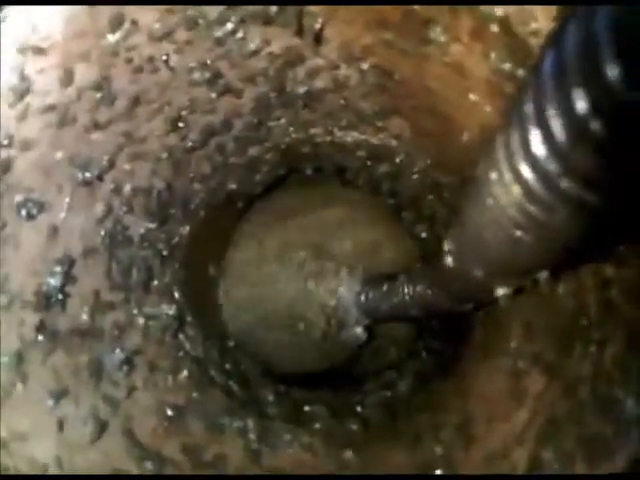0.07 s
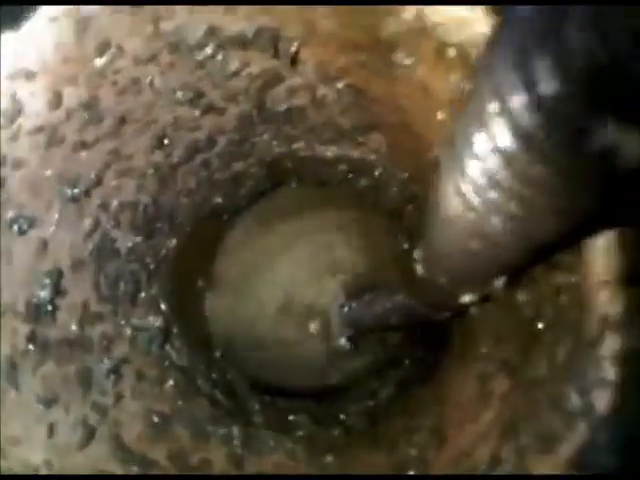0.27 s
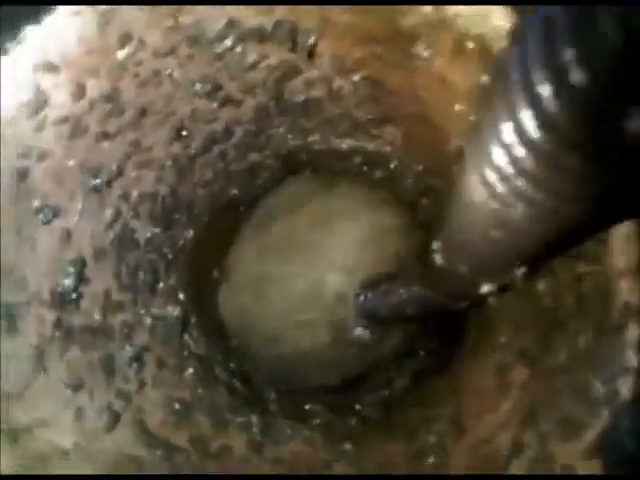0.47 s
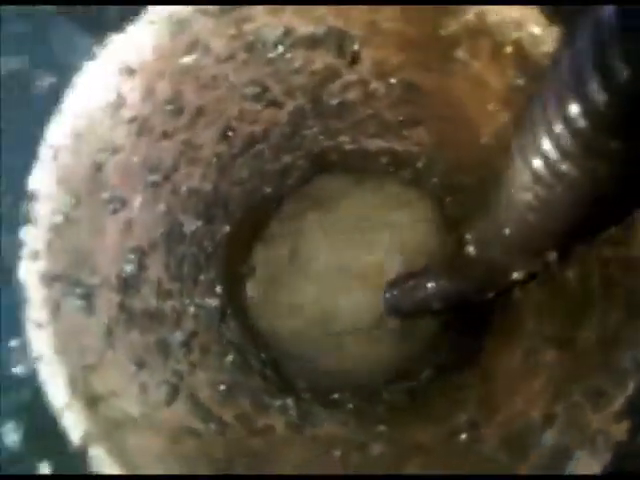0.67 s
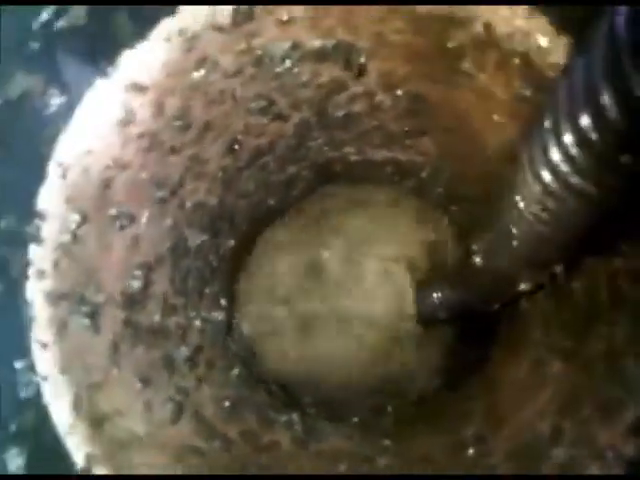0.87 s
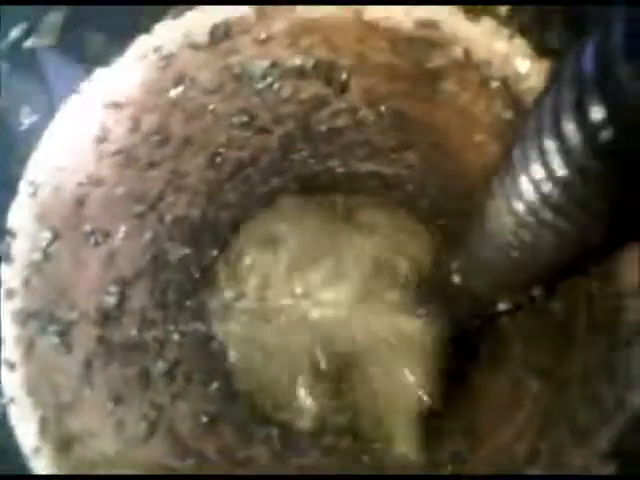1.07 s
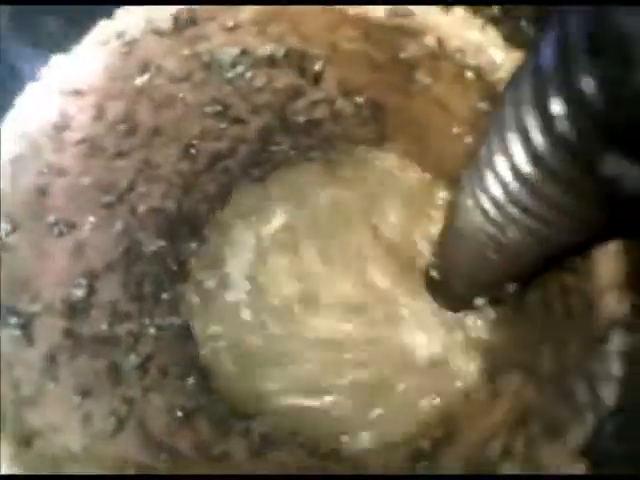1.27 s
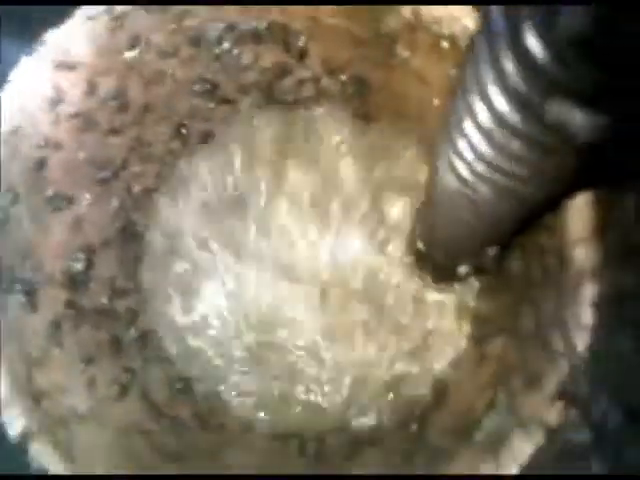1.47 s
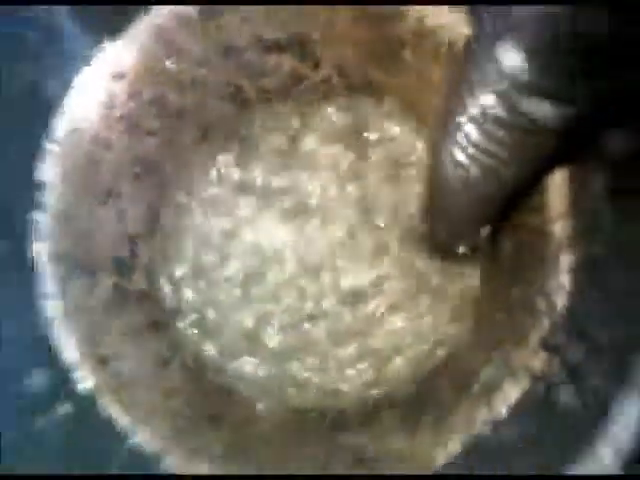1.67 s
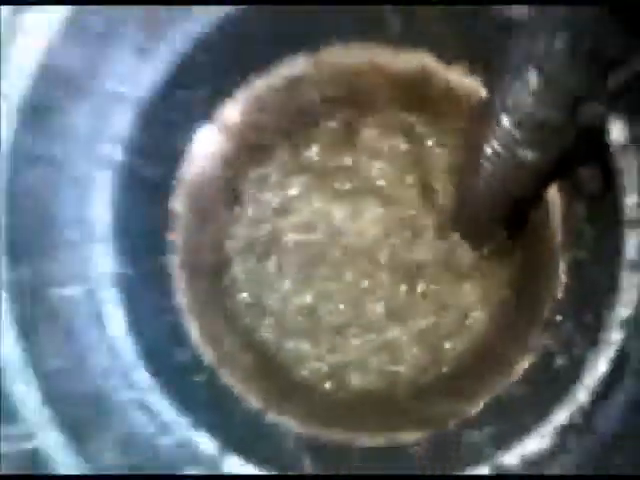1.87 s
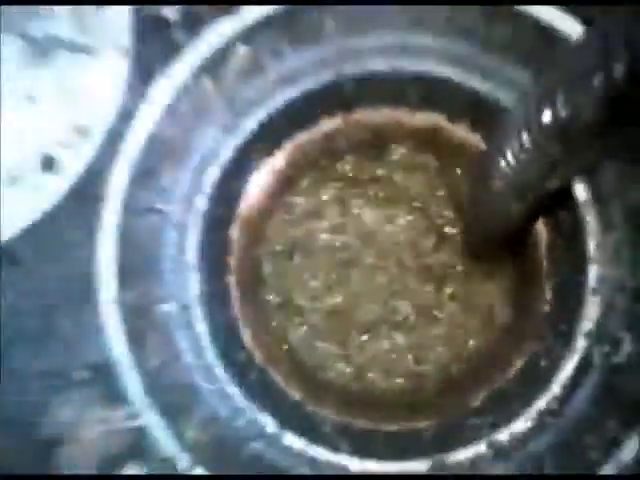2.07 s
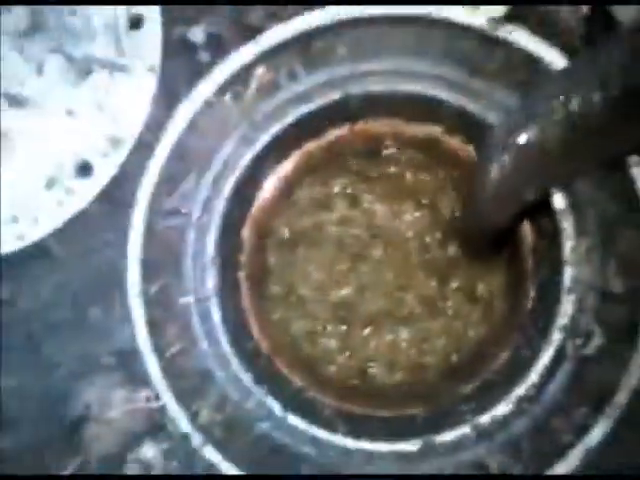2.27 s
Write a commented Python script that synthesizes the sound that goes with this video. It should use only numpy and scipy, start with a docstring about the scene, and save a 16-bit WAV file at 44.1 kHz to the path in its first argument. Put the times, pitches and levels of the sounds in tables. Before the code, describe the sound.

Close up on a narrow-sounding microphone in a quiet bathroom: a drain snake scrapes and thumps the basin, small plops follow, then duller metallic scrapes mix with gurgling air, churning water and bright drips.

```python
"""A faint trickle in quiet bathroom air, then the rasp of a coiled steel cable in a clogged basin drain,
close to a small microphone. The coils catch on the drain wall: stuttering bursts of grit ring the pipe,
and finer grit rubs beneath them. Knocks thump the basin as decaying low modes with a short clank.
Air gulps and churns in the rising water as swelling cycles and wavering tones that climb in pitch.
Plops, pings, drips and the trickle are bubbles: a few cycles that swell, fade and creep upward."""
import sys
import numpy as np
from scipy import signal
from scipy.fft import rfft, irfft
from scipy.io import wavfile
from scipy.ndimage import uniform_filter1d

SR = 44100
rng = np.random.default_rng(int(sys.argv[2]) if len(sys.argv) > 2 else 0)


def wrap_up_sound(samples):
    """Save the sound to the file named by the first command line argument, as 16-bit audio."""
    columns = np.atleast_2d(samples).T
    # keep every value between -1 and 1, then stretch to whole-number steps
    tamed = np.clip(columns, -1, 1)
    steps = np.round(tamed * 32767).astype(np.int16)
    wavfile.write(sys.argv[1], SR, steps)


N = 101430  # samples

ATTACK_SHARE, RELEASE_S, GRIT_DB = 0.16, 0.0028, 1  # attack as a share of the catch's length
RING_WIDTH_HZ, RING_DB = 130, -3  # the strongest ring, relative to the rest of the pipe
BROAD_DB = -17  # broad resonance behind the separate ones
BODY_HZ, BODY_WIDTH_HZ = 447, 486
STUTTER_DB, MODE_STUTTER_DB = 3.5, 5
# the risen water dulls and damps the steel
WET_FROM_S = 1.4
DRY_TREBLE_HZ, WET_TREBLE_HZ, TREBLE_WIDTH_HZ = 6070, 5110, 3020
DRY_WIDTH_HZ, WET_WIDTH_HZ = 75, 140  # width of each pipe resonance
PATCH_WIDTH_HZ, PATCH_SPREAD = 1300, 0.22  # patches of treble, spread in log frequency
# catches of the coils on the drain wall, close to the microphone: (time [s], pipe level [dB],
# low body level [dB], treble level [dB], strongest ring [Hz], length [ms])
CATCH_TABLE = [(0.026, -63, -59, -78, 1420, 5.8), (0.125, -66.5, -66, -62.5, 1570, 3.6),
               (0.217, -39.5, -36, -51, 1030, 6), (0.244, -40, -56, -57, 2320, 12.6),
               (0.287, -35, -44, -47.5, 945, 8.3), (0.297, -35.5, -42.5, -45.5, 2140, 9.3),
               (0.33, -47.5, -61, -66.5, 675, 2.4), (0.524, -46, -49.5, -55.5, 697, 3.6),
               (0.534, -43, -45, -49, 1327, 6.9), (0.549, -48, -52.5, -58.5, 1880, 22.2),
               (0.57, -44.5, -48.5, -49, 1946, 21.9), (0.599, -51, -53.5, -62, 1950, 9.4),
               (0.639, -53, -53, -49, 2050, 6.3), (0.669, -63.5, -58.5, -59.5, 1440, 17),
               (0.697, -42.5, -46, -74, 1923, 6.7), (0.707, -48, -58, -63, 1660, 10.6),
               (0.719, -48.5, -53.5, -50, 716, 10.6), (0.768, -51, -52, -57, 1993, 17),
               (0.835, -54, -67, -66.5, 690, 6.9), (1.385, -47.5, -61, -51.5, 1290, 4),
               (1.447, -55.5, -57, -73, 1470, 12.6), (1.459, -51.5, -55.5, -52, 728, 3.9),
               (1.573, -62, -68, -58.5, 2500, 7.7), (1.584, -51.5, -53, -76, 1500, 9.1),
               (1.602, -56, -67, -74, 2580, 34), (1.632, -46.5, -60, -65, 1780, 6.8),
               (1.652, -66, -46, -49, 2000, 2), (1.667, -48.5, -45.5, -65, 1716, 17),
               (1.696, -42.5, -58, -48, 2630, 3.4), (1.741, -50, -60, -54, 2654, 12.9),
               (1.803, -42.5, -65, -56, 1337, 8.1), (1.835, -51, -56, -64, 2840, 4.7),
               (1.844, -51.5, -57, -58.5, 2180, 10), (1.897, -38.5, -55, -50.5, 2113, 1.15),
               (1.902, -43.5, -73, -99, 1330, 5.4), (2.095, -45.5, -68, -57.5, 2710, 11.4),
               (2.112, -47, -74, -79, 1260, 7.9), (2.128, -46.5, -60, -69, 1297, 10),
               (2.148, -54.5, -63, -77, 1910, 15), (2.164, -49.5, -63, -86, 1380, 11),
               (2.189, -58, -69, -81, 1360, 19), (2.279, -59.5, -76, -69, 2160, 3)]


def catches():
    """Each catch is a stuttering burst of grit that rings the pipe, its body and patches of the steel's treble."""
    out, t = np.zeros(N), np.arange(3072) / SR
    for start, pipe_db, body_db, treble_db, ring_hz, ms in CATCH_TABLE:
        length = ms / 1000
        rise = np.minimum(t / (ATTACK_SHARE * length), 1)
        env = rise * np.exp(-np.maximum(t - length, 0) / RELEASE_S)
        energy_span = SR * (length + RELEASE_S / 2)

        def unit(x):
            """Unit power over the length of the catch."""
            return x / np.sqrt(np.sum(x ** 2) / energy_span)

        low_grit, treble_grit = grit((2, len(t)), GRIT_DB) * env * slips(len(t), STUTTER_DB)
        wet = start >= WET_FROM_S
        steel_hz = WET_TREBLE_HZ if wet else DRY_TREBLE_HZ
        width_hz = WET_WIDTH_HZ if wet else DRY_WIDTH_HZ

        strongest = band_twice(low_grit, ring_hz, RING_WIDTH_HZ)
        ring = unit(pipe(low_grit, width_hz)) + undb(RING_DB) * unit(strongest)

        broad_body = undb(BROAD_DB) * band_twice(low_grit, BODY_HZ, BODY_WIDTH_HZ)
        body = modes(low_grit, True, width_hz) + broad_body

        treble = band_twice(treble_grit, steel_hz, TREBLE_WIDTH_HZ)
        for patch_hz in steel_hz * np.exp(PATCH_SPREAD * rng.uniform(-1.58, 1, size=2)):
            stuttered = treble_grit * slips(len(t), MODE_STUTTER_DB)
            treble += band_twice(stuttered, patch_hz, PATCH_WIDTH_HZ)

        burst = undb(pipe_db) * unit(ring) + undb(body_db) * unit(body) + undb(treble_db) * unit(treble)
        add(out, start, burst)
    return out


def grit(size, spread_db):
    """Dense clicks of uneven strength."""
    return rng.standard_normal(size) * undb(spread_db * np.minimum(rng.exponential(size=size), 3))


def slips(size, db):
    """A gain that jumps every few milliseconds as the coils stick and slip."""
    hold = 110  # samples
    heights = np.r_[1, rng.standard_normal(size // hold + 1)]
    steps = uniform_filter1d(np.repeat(heights, hold), size=40)[:size]
    return undb(db * np.clip(steps, -2, 2))


BODY_TOP_HZ, PIPE_TOP_HZ = 900, 3400


def pipe(x, width_hz):
    """The separate resonances above the body plus a broad one, kept to the pipe's own range."""
    rings = modes(x, False, width_hz) + undb(BROAD_DB) * band(x, 2700, 1400)
    sos = signal.butter(4, (BODY_TOP_HZ, PIPE_TOP_HZ), "band", fs=SR, output="sos")
    return signal.sosfilt(sos, rings)


MODE_SCATTER_DB, MODE_DETUNE = 4, 0.015  # each contact point favours other resonances
# resonances of drain pipe and cable: (pitch [Hz], relative level [dB])
PIPE_MODES = [(441, -5.5), (554, -9.5), (759, -9.5), (1035, -1.5), (1355, -3.5), (1647, 2.5), (2050, -2),
              (2180, -8.5), (2335, -9), (2710, -6.5), (2925, -20), (3420, -29.5)]


def modes(x, low, width_hz):
    """The resonances below or above the body's top; each is favoured, detuned and caught by its own chance."""
    out = np.zeros(len(x))
    for hz, db in PIPE_MODES:
        if (hz < BODY_TOP_HZ) == low:
            gain = undb(db + MODE_SCATTER_DB * rng.uniform(-4.1, 1))
            caught = x * slips(len(x), MODE_STUTTER_DB)
            detuned_hz = hz * (1 + MODE_DETUNE * rng.standard_normal())
            out += gain * band(caught, detuned_hz, width_hz)
    return out


KNOCK_T60_S, KNOCK_PUSH_S = 0.13, 0.0016
DEEP_HZ, DEEP_DB, DEEP_T60_S = 105.8, -15.5, 0.27  # level relative to the upper mode
CLANK_DB, CLANK_T60_S = -10, 0.042
# knocks on the basin: (time [s], level of the upper mode [dB], its pitch [Hz])
KNOCK_TABLE = [(0.2207, -17, 168.3), (0.289, -30.5, 167), (0.531, -37.5, 169.7), (0.695, -36, 182),
               (1.632, -39.5, 169), (1.667, -40, 171)]


def knocks():
    """A soft push sets off the basin's two low modes and a short clank of the pipe."""
    out, t = np.zeros(N), np.arange(16384) / SR

    def mode(hz, t60):
        """A sine that loses 60 dB in t60 seconds."""
        return np.sin(2 * np.pi * hz * t) * undb(-60 * t / t60)

    clank = np.zeros(len(t))
    for k, (hz, db) in enumerate(PIPE_MODES):
        clank += (-1) ** k * undb(db) * mode(hz, CLANK_T60_S)  # alternating signs
    deep = undb(DEEP_DB) * mode(DEEP_HZ, DEEP_T60_S)
    push = 1 - np.exp(-t / KNOCK_PUSH_S)
    for start, db, hz in KNOCK_TABLE:
        ring = mode(hz, KNOCK_T60_S) + deep + undb(CLANK_DB) * clank
        add(out, start, undb(db) * ring * push)
    return out


CHURN_DB, CHURN_WIDTH_HZ = -3, 66  # level ahead of the resonance and the curve
# gulps of air in the drain: (time [s], peak level [dB], starting pitch [Hz])
GULP_TABLE = [(1.448, -38.5, 255.7), (1.465, -40.5, 241.6), (1.509, -44.5, 244.6), (1.542, -37.5, 257),
              (1.591, -35, 247), (1.608, -39.5, 261), (1.633, -35, 303), (1.662, -36, 297),
              (1.676, -33.5, 229), (1.708, -41, 298), (1.721, -48, 286), (1.746, -35, 298),
              (1.845, -43.5, 312), (1.862, -37, 324), (2.104, -41, 424), (2.136, -42.5, 460),
              (2.165, -41, 410)]
# churning of the air column over the rising water, one list per spell:
# (time [s], relative level [dB], pitch [Hz])
CHURN_SPELLS = [
    [(1.42, -83.5, 253.7), (1.668, -35.5, 269), (1.9, -75, 349.6)],
    [(2.06, -68.5, 364.5), (2.112, -43.5, 400.6), (2.24, -65.5, 429)],
]


def gulps():
    """Single gulps over a churning air column whose pitch climbs with the water."""
    out = np.zeros(N)
    for start, db, hz in GULP_TABLE:
        add(out, start, undb(db) * bubble(hz, rise=0.99, fall=2.14, glide=0.018))
    smoothing = np.exp(-np.pi * CHURN_WIDTH_HZ / SR)
    for rows in CHURN_SPELLS:
        # two slow random gains on a cosine and a sine make a tone that wavers
        wobble = signal.lfilter([1], [1, -smoothing], rng.standard_normal((2, N)))
        phase = 2 * np.pi * np.cumsum(curve(rows, 2)) / SR
        air = level(wobble[0] * np.cos(phase) + wobble[1] * np.sin(phase), CHURN_DB)
        out += band(air, 250, 460) * undb(curve(rows, 1, outside=-120))
    return out


# rubbing that swells and fades under the catches: (time [s], rasp level [dB], hiss level [dB])
RUB_CURVE = [(0, -89, -80.5), (.2, -77.5, -78.5), (.23, -43.5, -67), (.34, -66.5, -64), (.48, -73, -79),
             (.54, -59, -61.5), (.74, -69.5, -78), (.86, -75, -74.5), (1.42, -69.5, -83.5),
             (1.46, -58, -49.5), (1.56, -63.5, -84), (1.6, -61, -59.5), (1.77, -62, -67),
             (1.88, -57.5, -70.5), (1.93, -66.5, -78.5), (2.07, -70, -82), (2.11, -61, -52.5),
             (2.21, -64, -77), (2.3, -75.5, -82)]


def rubbing():
    """Fine, uneven grit under the cable, through the same pipe; the treble crackles in two patches."""
    rasp_grit, lower_grit, upper_grit = grit((3, N), GRIT_DB)
    rasp = level(pipe(rasp_grit * flicker(140, db=4.5), WET_WIDTH_HZ), 0)
    lower = band_twice(lower_grit * flicker(160, db=7.5), 4480, 1500)
    upper = band_twice(upper_grit * flicker(160, db=7.5), 6100, 1500)
    hiss = level(lower + upper, 0)
    return rasp * undb(curve(RUB_CURVE, 1)) + hiss * undb(curve(RUB_CURVE, 2))


def flicker(rate, db):
    """An uneven gain that changes about rate times a second."""
    k = int(SR / rate)
    steps = np.repeat(rng.standard_normal(N // 100), k)
    return undb(db * uniform_filter1d(steps, k)[:N])


# plops, mostly low, with a few high pings: (time [s], peak level [dB], starting pitch [Hz])
PLOP_TABLE = [(.988, -49, 780), (1.034, -48.5, 830), (1.113, -51, 790), (1.157, -49.5, 725),
              (1.199, -49.5, 710), (1.387, -39, 1170), (1.460, -41, 758), (1.616, -45, 850),
              (1.697, -49, 890), (1.768, -56.5, 586), (2.203, -46.5, 2980)]
# drips: (time [s], peak level [dB], starting pitch [Hz])
DRIP_TABLE = [(1.116, -51.5, 1710), (1.137, -55, 1670), (1.157, -51.5, 1690), (1.184, -54, 1620),
              (1.297, -51.5, 1400), (1.582, -47.5, 1950), (1.676, -34.5, 1760), (1.719, -57, 1310),
              (2.129, -38.5, 1820), (2.151, -46, 1730), (2.19, -45, 1760), (2.207, -47, 1800),
              (2.22, -62, 1650), (2.245, -44, 1490), (2.2553, -45.5, 1630)]


def plops():
    """Plops and pings, and drips that chirp upward."""
    out = np.zeros(N)
    for start, db, hz in PLOP_TABLE:
        add(out, start, undb(db) * bubble(hz, rise=2.46, fall=2.9, glide=0.0023))
    for start, db, hz in DRIP_TABLE:
        add(out, start, undb(db) * bubble(hz, rise=1.9, fall=4.7, glide=0.011))
    return out


def bubble(hz, rise, fall, glide):
    """A few cycles that swell, fade and creep up in pitch; rise and fall in cycles."""
    cycles = np.arange(int((rise + 5 * fall) * SR / hz)) * hz / SR
    swell = np.sin(np.pi / 2 * np.minimum(cycles / rise, 1)) ** 2
    fade = np.exp(-np.maximum(cycles - rise, 0) / fall)
    return swell * fade * np.sin(2 * np.pi * cycles * (1 + glide * cycles / 2))


BUBBLES_PER_S, BUBBLE_SCATTER_DB, BUBBLE_SPREAD = 450, 5, 0.14  # spread in log pitch
# trickle of bubbles: (time [s], level [dB])
TRICKLE_CURVE = [(0, -67), (.85, -68), (1., -62.5), (1.33, -64.5), (1.56, -71.5), (1.68, -52.5),
                 (1.8, -75.5), (2.07, -77.5), (2.13, -57.5), (2.3, -82)]
# bubble sizes that the narrow drain favours: (pitch [Hz], relative level [dB])
BUBBLE_SIZES = [(560, 1), (780, 0), (1150, -2), (1680, 3.5), (2600, -7)]


def trickle():
    """Many small bubbles of a few favoured sizes."""
    out, count = np.zeros(N), int(BUBBLES_PER_S * N / SR)
    starts = rng.random(count) * N / SR
    picks = rng.integers(len(BUBBLE_SIZES), size=count)
    for start, pick, (size, loud) in zip(starts, picks, rng.standard_normal((count, 2))):
        hz, db = BUBBLE_SIZES[pick]
        hz = hz * np.exp(BUBBLE_SPREAD * size)
        db = db + BUBBLE_SCATTER_DB * np.clip(loud, -2, 2)
        add(out, start, undb(db) * bubble(hz, rise=0.29, fall=4, glide=0.01))
    return level(out, 0) * undb(curve(TRICKLE_CURVE, 1))


ROOM_DB = -66.5
# spectrum of the bathroom air: (frequency [Hz], relative level per Hz [dB])
ROOM_SPECTRUM = [(18, -30.5), (30, 3), (190, 12.5), (1150, -20), (1630, -8.5), (6790, -33.5), (8000, -31),
                 (10400, -79), (17600, -120)]


def room():
    """The quiet bathroom air: noise shaped along a spectrum."""
    hz = np.arange(N // 2 + 1) * SR / N + 1  # kept above zero for the logarithm
    rows = np.array(ROOM_SPECTRUM)
    shape_db = np.interp(np.log(hz), np.log(rows[:, 0]), rows[:, 1])
    air = irfft(rfft(rng.standard_normal(N)) * undb(shape_db), N)
    return level(air, ROOM_DB)


def undb(db):
    """Decibels to amplitude."""
    return 10 ** (np.asarray(db) / 20)


def level(x, db):
    """Set the RMS level."""
    return x * undb(db) / np.sqrt(np.mean(x ** 2))


def band(x, hz, width_hz):
    """Resonance with gain 1 at the centre."""
    return signal.lfilter(*signal.iirpeak(hz, hz / width_hz, fs=SR), x)


def band_twice(x, hz, width_hz):
    """The same resonance twice, for steeper sides."""
    return band(band(x, hz, width_hz), hz, width_hz)


def curve(rows, col, outside=None):
    """Straight lines through one column over time; outside replaces the held end values."""
    rows = np.array(rows)
    return np.interp(np.arange(N) / SR, rows[:, 0], rows[:, col], outside, outside)


def add(out, start, x):
    """Mix x into out from start seconds on."""
    i = max(int(start * SR), 0)
    out[i:i + len(x)] += x[:N - i]


# the level dips briefly: (centre time [s], length [s], depth [dB])
DIP_TABLE = [(0.203, 0.011, -41), (0.747, 0.01, -26), (1.43, 0.0078, -9)]


def scene():
    """All layers; the dips touch only the knocks, rubbing, trickle and room."""
    t = np.arange(N) / SR
    dips_db = sum(db * np.exp(-((t - centre) / length * 2) ** 2) for centre, length, db in DIP_TABLE)
    undipped = catches() + gulps() + plops()
    dipped = knocks() + rubbing() + trickle() + room()
    return (undipped + undb(dips_db) * dipped)[None]


MIC_LOW_HZ, MIC_TOP_HZ, TOP_HZ = 65, 7300, 15600
HISS_DB = -92.5  # ahead of the last low-pass


def record(dry):
    """A narrow microphone channel with faint electronic hiss."""
    mic = signal.sosfilt(signal.cheby1(10, .5, MIC_TOP_HZ, fs=SR, output="sos"), dry)
    mic = signal.sosfilt(signal.butter(2, MIC_LOW_HZ, "high", fs=SR, output="sos"), mic)
    mic = mic + undb(HISS_DB) * rng.standard_normal(dry.shape)
    return signal.sosfilt(signal.ellip(8, .2, 70, TOP_HZ, fs=SR, output="sos"), mic)


dry = scene()
out = record(dry)
wrap_up_sound(out)
```